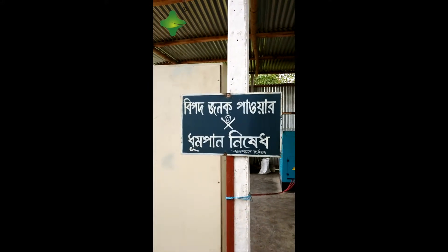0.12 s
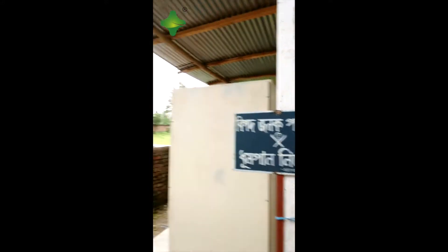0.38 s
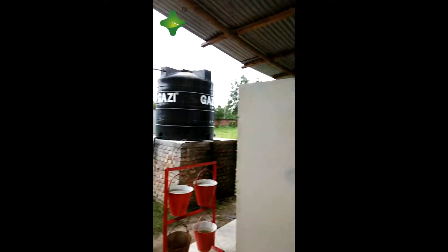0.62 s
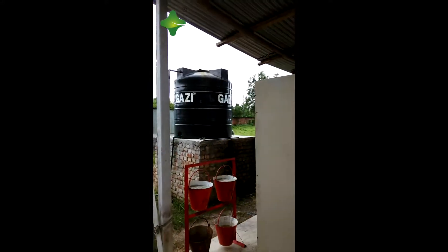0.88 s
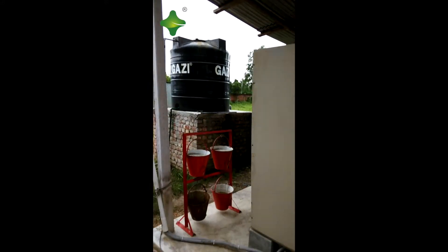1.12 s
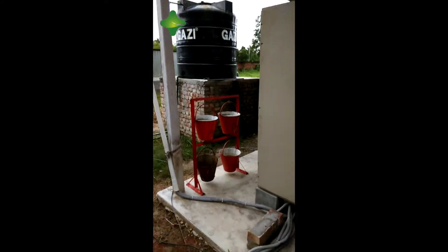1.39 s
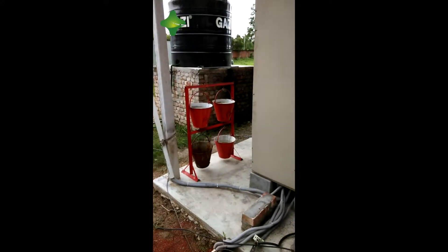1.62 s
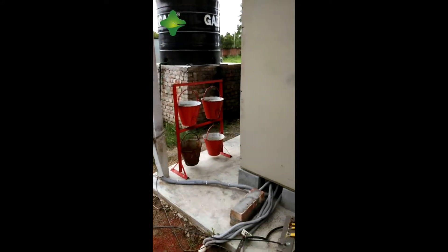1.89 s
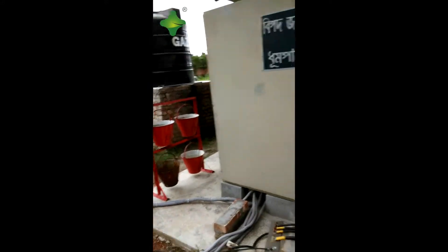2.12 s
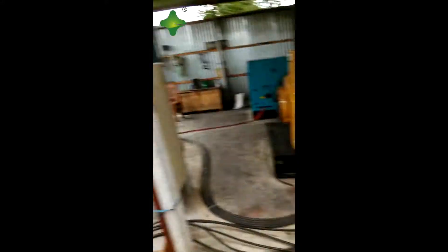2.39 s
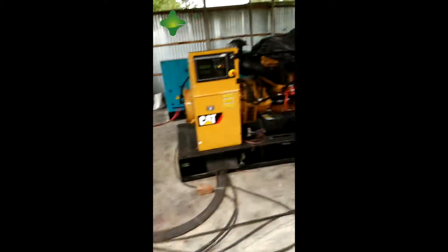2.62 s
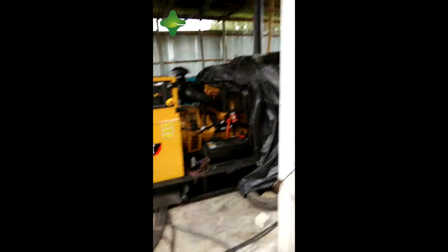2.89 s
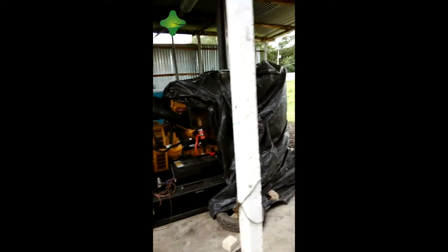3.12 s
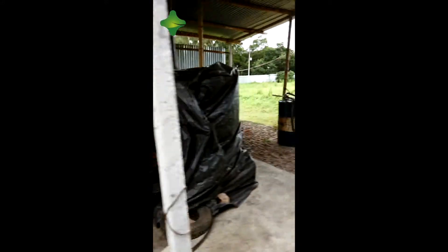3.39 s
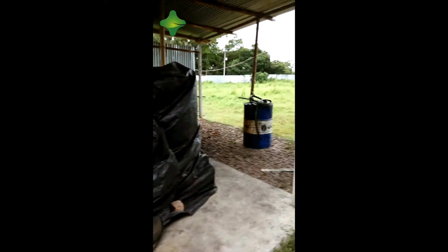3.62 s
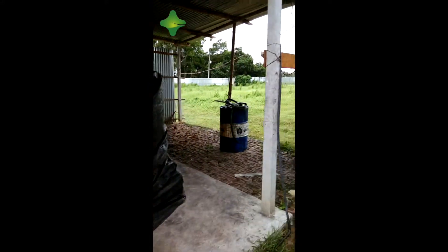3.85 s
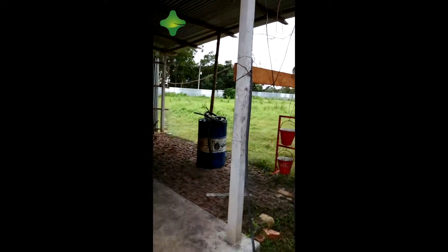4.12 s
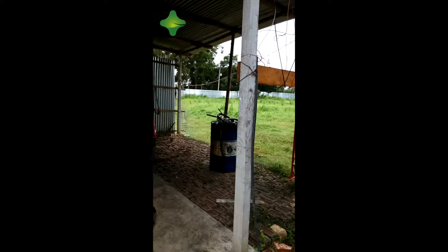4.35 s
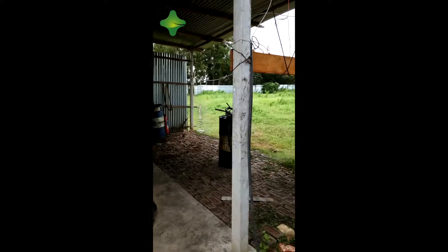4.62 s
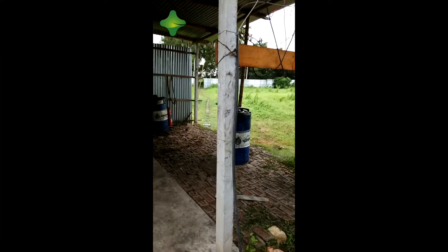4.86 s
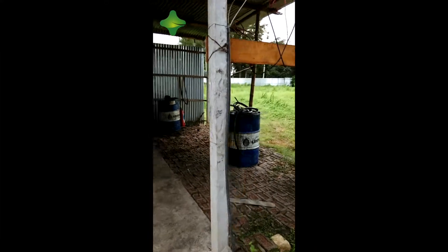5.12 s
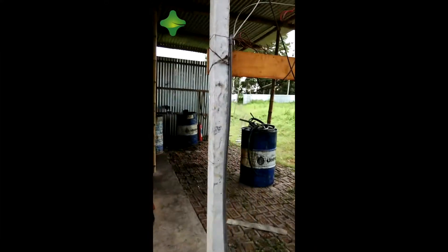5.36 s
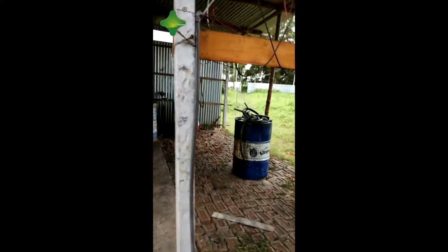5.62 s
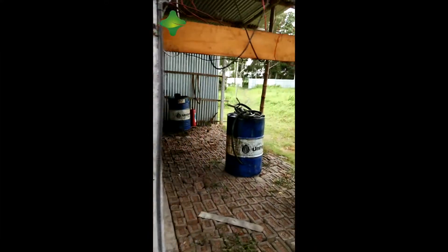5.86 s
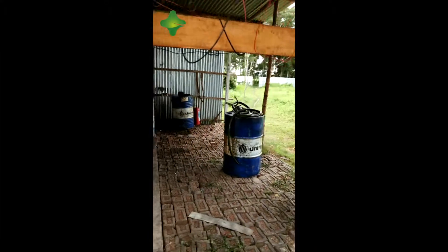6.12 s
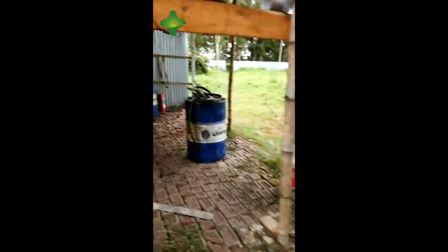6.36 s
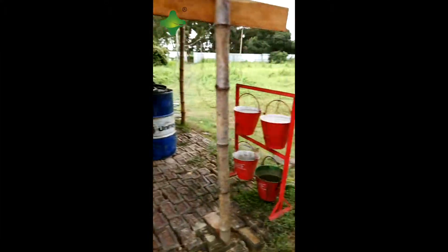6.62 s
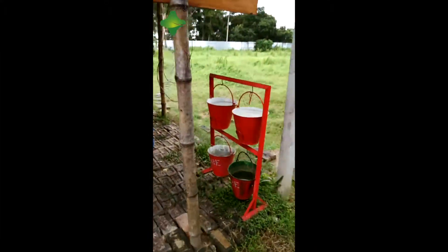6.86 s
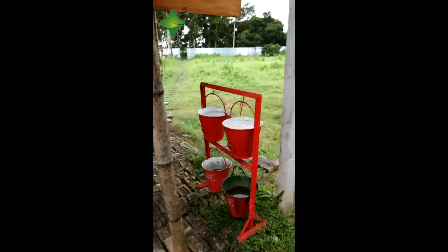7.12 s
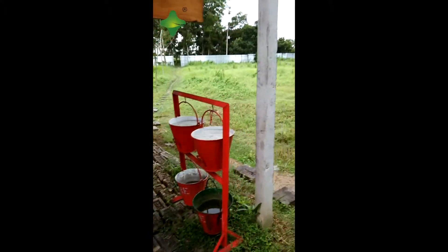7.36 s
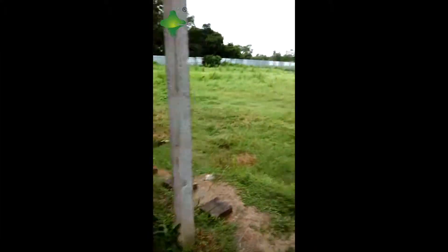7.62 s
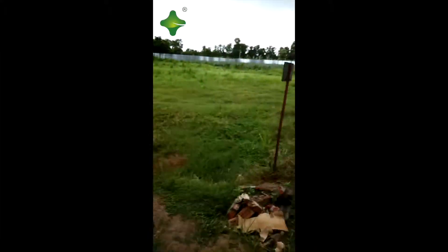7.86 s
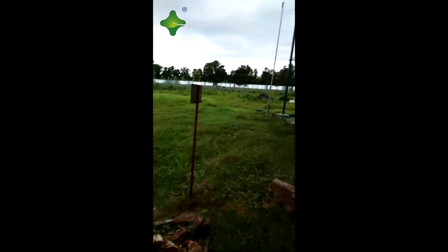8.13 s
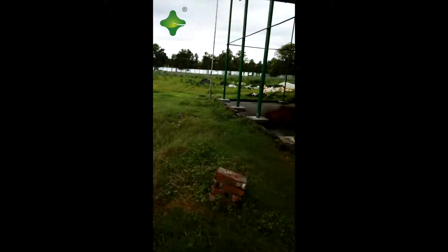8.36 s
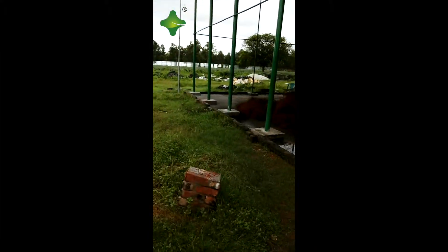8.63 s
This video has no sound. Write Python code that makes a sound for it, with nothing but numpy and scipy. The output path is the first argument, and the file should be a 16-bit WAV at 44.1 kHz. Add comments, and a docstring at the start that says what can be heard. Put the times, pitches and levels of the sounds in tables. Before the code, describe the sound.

Strong wind gusts thump the microphone, then uneven footsteps crunch over gritty paving and grass with small snaps, while faint birds chirp behind.

```python
"""In a quiet open field, someone walks over grass and gritty paving.
Gusts buffet the microphone with low thumps: shaped noise plus single pulses.
Soles swish and crunch (grains and noise through a hollow ring), and twigs and pebbles snap (short ringing tones).
Small birds chirp in falling sweeps with echoes; a whistle, hoots and a drone are narrow bands of noise.
Thin insect whirs and a soft hush of filtered noise lie behind."""
import sys
import numpy as np
from scipy import signal
from scipy.fft import next_fast_len
from scipy.io import wavfile
from scipy.ndimage import uniform_filter1d

SR = 44100
rng = np.random.default_rng(int(sys.argv[2]) if len(sys.argv) > 2 else 0)


def log_audio(samples):
    """Write samples as a 16-bit WAV file to the path given in sys.argv[1]."""
    # one column per channel
    frames = np.atleast_2d(samples).T
    # limit to full scale, then quantise
    limited = np.clip(frames, -1, 1)
    pcm = np.round(limited * 32767).astype(np.int16)
    wavfile.write(sys.argv[1], SR, pcm)


def boost_factor(decibels):
    """Convert a level in decibels to a linear amplitude factor."""
    exponent = np.asarray(decibels, float) / 20
    return 10 ** exponent


N = 385434
TIME = np.arange(N) / SR  # seconds

# Tone colour of the field's hush. Each row: frequency in Hz, relative strength in dB per Hz.
HUSH_COLOUR = [(20, -28.5), (50, -4), (130, 1), (400, 3), (1000, -3.5), (2000, -4.5), (3200, -6),
               (4000, -8), (6300, -13.5), (10000, -26), (13000, -14)]
# The hush slowly rises and falls in level. Each row: time in seconds, change in dB.
HUSH_LEVEL_CHANGE = [(0, 2), (2, 0), (5.3, 1.5), (6.3, 0.5), (6.75, -3), (7.5, -4.5), (8.05, -4),
                     (8.74, -1)]
# Thin insect whirs. Each row: start in seconds, end in seconds, pitch in Hz, width of each of two
# resonances in Hz, middle level in dB.
INSECT_WHIRS = [(.55, 1.6, 8300, 400, -91), (2.95, 3.4, 8200, 300, -91), (3.9, 4.3, 8200, 300, -92),
                (.2, 3.3, 10400, 700, -94), (4.3, 7.3, 10200, 700, -94)]
# A soft low drone that swells and fades. Each row: time in seconds, pitch in Hz, level in dB.
LOW_DRONE = [(5.3, 340, -88), (5.43, 338, -69), (5.6, 361, -69), (5.95, 360, -67), (6.2, 350, -71),
             (6.55, 319, -71), (6.7, 320, -88)]
# Soft low hoots in the distance. Each row: start in seconds, length in seconds, first pitch in Hz,
# last pitch in Hz, level in dB between the fades.
SOFT_HOOTS = [(.68, 0.198, 895.5, 914.6, -76), (3.378, .14, 350.1, 329.7, -68.5),
              (4.155, .26, 726.7, 702, -72.5), (4.421, 0.2397, 686.7, 664, -67),
              (5.083, 0.514, 724.3, 668, -79.5), (5.396, 0.375, 344.4, 408, -70.5),
              (6.101, 0.252, 724.6, 670.7, -78), (7.167, 0.116, 340, 342.3, -74),
              (7.382, 0.104, 352.6, 349.3, -73.5)]
# A blurred rising whistle far off. Each row: time in seconds, pitch in Hz, level in dB.
FAR_WHISTLE = [(5.19, 4500, -71.5), (5.23, 4250, -69.5), (5.29, 4370, -66.5), (5.34, 4350, -67),
               (5.37, 4770, -66), (5.42, 4900, -75.5)]
# Falling bird chirps. Each row: start in seconds, direct level in dB, echo level in dB before a 2.5 dB lift.
FALLING_CHIRPS = [(.56, -100.5, -75), (0.744, -75, -68.5), (.785, -88, -70), (.975, -77, -67.5),
                  (1.012, -83.5, -70.5), (1.2, -72.5, -67), (1.24, -83, -74.5), (3.92, -81, -74),
                  (4.12, -91.5, -75), (5.169, -80.5, -67), (5.212, -70, -80), (5.405, -67, -65),
                  (5.44, -60.5, -72.5), (5.595, -76.5, -82.5), (5.632, -61.5, -66.5), (5.669, -59.5, -69)]
# Twigs and pebbles that snap. Each row: start in seconds, peak level in dB before a 1.8 dB cut, pitch in Hz,
# upper tone in dB relative to the lower before a 3 dB lift, seconds for the lower tone to fade by 60 dB.
TWIG_SNAPS = [(1.222, -44, 874.8, -10.5, 0.0267), (1.698, -51.5, 856.7, 7, 0.0076),
              (1.719, -45, 927, -1.5, 0.0082), (1.824, -51, 2290, -14.5, 0.0092),
              (2.247, -45, 1137, -22.5, 0.0128), (2.811, -47, 1260, -16.5, 0.0077),
              (2.856, -49.5, 1544, -12, 0.012), (2.986, -41.5, 1679, -8.5, 0.0114),
              (3.158, -41, 1150, -5, 0.0099), (3.526, -39.5, 1126, -28.5, 0.0093),
              (3.585, -43.5, 1350, -22, 0.0123), (3.615, -35, 1410, -34.5, 0.0083),
              (3.698, -51.5, 816, -16.5, 0.00677), (3.733, -38, 909.5, -27.5, 0.0144),
              (3.78, -40.5, 1420, -19, 0.013), (4.125, -44, 2455, -20, 0.00595),
              (4.302, -46.5, 1326, -2.5, 0.0078), (4.314, -51, 1300, -14, 0.00919),
              (4.335, -38.5, 713, -1, 0.0115), (4.374, -36.5, 1012, 13.5, 0.0079),
              (4.731, -45, 1304, -0.5, 0.0081), (4.798, -44, 1050, 0.5, 0.00593),
              (4.83, -45, 997, -11.5, 0.0164), (4.883, -60.5, 1030, -10.5, 0.009),
              (4.935, -43.5, 1100, 1, 0.0088), (5.011, -54.5, 937, -14, 0.0089),
              (5.032, -37.5, 915, 3.5, 0.0079), (5.058, -39.5, 1068, -4.5, 0.0143),
              (5.611, -45, 1480, 4, 0.0058), (5.642, -54, 1270, -3.5, 0.0057),
              (5.674, -40, 1053, 2.5, 0.0108), (5.701, -41.5, 2240, -11, 0.0079),
              (6.051, -46.5, 564, -22, 0.015), (6.237, -42.5, 1367, 0.5, 0.0164),
              (6.273, -45.5, 1140, 2.5, 0.0067), (6.333, -46, 960, -0.5, 0.0068),
              (6.359, -42, 920, -9, 0.00603), (6.638, -56.5, 1160, -7, 0.00876),
              (6.795, -55, 1270, -8, 0.0138), (6.814, -39, 1150, -1, 0.0139),
              (6.858, -44, 1086, 4.5, 0.0123), (6.93, -42, 1130, -18.5, 0.0165),
              (6.954, -41.5, 1296, -1.5, 0.0065), (7.005, -43.5, 1900, -4.5, 0.0048),
              (7.06, -45.5, 1200, -4, 0.005), (7.108, -49.5, 1200, -4, 0.0052),
              (7.126, -40.5, 1200, -1.5, 0.005), (7.263, -40.5, 1220, -1, 0.0081),
              (7.704, -43, 982, -26, 0.0105), (7.753, -43.5, 1091, -17.5, 0.016),
              (7.78, -40.5, 974, -21, 0.032), (7.841, -36, 857, -24.5, 0.0093),
              (8.187, -52, 824, -25.5, 0.0082), (8.341, -48.5, 1240, -22.5, 0.0125),
              (8.534, -43.5, 1130, -26, 0.012)]
# Tone colour of the crunching ground. Each row: frequency in Hz, relative strength in dB per Hz.
GROUND_COLOUR = [(120, -39.5), (200, -20), (330, -6.5), (540, -4), (960, -5.5), (1460, -7.5), (2020, -4),
                 (3200, -10.5), (4200, -21.5), (6000, -28.5), (13000, -55.5)]
# Soles that press and drag. Each row: peak time in seconds, peak level in dB, seconds to rise 20 dB,
# seconds to fall 20 dB (signs ignored), middle pitch in Hz of the hollow under the sole.
SOLE_SCUFFS = [(.04, -68, .5, .3, 1950), (.17, -70, 0.03, .15, 1850), (.6, -70.5, 0.34, 0.38, 705.6),
               (.85, -74, 0.21, .3, 1500), (.98, -71, 0.2218, 0.17, 1196), (1.3, -73, -0.97, 0.64, 845),
               (1.6, -71, 0.24, .2, 1900), (1.719, -64, -0.0425, 0.1254, 1290),
               (1.83, -77, 0.1194, 0.02, 1710), (2.26, -64, 0.373, 0.64, 1018),
               (2.4, -53, 0.18, 0.22, 1023), (2.54, -57, 0.1344, 0.12, 1254),
               (2.95, -57.5, 0.3033, 0.4, 1340), (3.1, -50, 0.137, 0.117, 972),
               (3.159, -50, -0.0046, 0.076, 1220), (3.3, -70, 0.31, 0.13, 1000),
               (3.6, -60.5, 0.38, 0.2948, 1157), (3.741, -50.5, 0.1467, 0.1978, 878),
               (4.055, -59.5, 0.0662, -0.05, 478.4), (4.15, -67, 0.35, 0.94, 1520),
               (4.31, -54.5, 0.014, 0.0849, 1090), (4.385, -49.5, 0.091, 0.2765, 1275),
               (4.8, -63.5, 0.28, 0.75, 1210), (5.06, -50.5, 0.0646, 0.1922, 1036),
               (5.3, -77, -0.4, 0.95, 950), (5.5, -72, -0.69, -0.27, 800),
               (5.701, -55.5, 0.0967, 0.16, 1096), (5.8, -54, 0.1614, 0.1246, 1112),
               (5.89, -60.5, 0.14, 0.06, 1210), (5.93, -66.5, 0.29, 0.0951, 420),
               (6.07, -63.5, 0.16, 0.06, 500), (6.16, -71, -0.1, -0.12, 420),
               (6.27, -65.5, -0.24, 0.16, 1107), (6.36, -56, 0.0835, 0.0632, 1014),
               (6.409, -47.5, 0.02, 0.09, 1068), (6.47, -62.5, 0.2243, 0.0974, 450),
               (6.55, -60, 0.29, .16, 1300), (6.85, -65, 0.1655, 0.36, 1268),
               (6.936, -51, 0.0053, .04, 910), (7.05, -55, 0.2176, 0.2379, 1106),
               (7.15, -55.5, 0.2156, 0.0553, 1587), (7.22, -62, 0.4435, 0.1352, 1534),
               (7.36, -72.5, 1.42, 0.13, 1200), (7.6, -69, .15, 0.03, 1300),
               (7.71, -61.5, 0.0338, 0.14, 1000), (7.78, -54.5, 0.09, 0.09, 970),
               (7.84, -57.5, 0.074, 0.0729, 1024), (8.19, -70, 0.24, 1.43, 1102),
               (8.35, -67, 0.1274, 0.15, 1090), (8.46, -59.5, 0.07, 0.2, 1093),
               (8.545, -55, 0.0453, 0.0448, 1150), (8.66, -62.5, 0.2436, 0.09, 1254)]
# Bursts of fine sand and grass hiss. Each row: peak time in seconds, peak level in dB,
# seconds to rise 20 dB, seconds to fall 20 dB (signs ignored).
SAND_SPRAYS = [(3.11, -88.5, 0.34, -0.49), (4.31, -80, -0.03, -0.05), (4.38, -86, -0.01, 0.02),
               (4.53, -86, 0.02, 0.06), (6.412, -77, -0.0448, -0.4948), (7.03, -86, -0.47, 0.06)]
# Gusts on the microphone. Each row: peak time in seconds, peak level in dB before a 1 dB cut, seconds to
# rise 20 dB, seconds to fall 20 dB (signs ignored), eddy pitch in Hz before the gust's strength shifts it.
WIND_GUSTS = [(.025, -32, .08, .03, 140), (.12, -32, .045, 0.061, 126.9), (.165, -42, -0.29, .06, 125.1),
              (.24, -55, 0.38, 0.2, 110.1), (.338, -21, 0.0279, 0.0169, 156), (.4, -36, 0.08, 0.02, 120.2),
              (.47, -32, 0.0119, 0.0165, 155), (.542, -23, 0.0862, 0.0578, 167.7),
              (.59, -25, 0.0512, -0.0035, 172), (.65, -34, 0.1, 0.07, 125),
              (.765, -32, 0.1272, 0.0911, 141.5), (.904, -34, 0.1158, 0.0364, 156.2),
              (1.082, -36.5, 0.16, 0.0948, 123), (1.212, -38, 0.1435, 0.097, 139.4),
              (1.368, -44.5, 0.1365, 0.31, 121.9), (1.524, -51.5, 0.05, 0.16, 132),
              (1.768, -50.5, 0.02, 0.11, 96), (2.005, -39, 0.03, 0.0743, 101.9),
              (2.12, -47.5, 0.0272, 0.0323, 140.3), (2.17, -35, 0.0139, 0.0582, 164),
              (2.204, -31.5, 0.0465, 0.0585, 133.4), (2.265, -36.5, 0.03, 0.03, 155.3),
              (2.316, -32, 0.0452, 0.0842, 163.7), (2.372, -35, 0.1058, 0.0736, 128.1),
              (2.42, -37.5, 0.06, 0.0246, 139.5), (2.506, -41, 0.1118, 0.04, 136),
              (2.63, -40.5, 0.1078, 0.0813, 139.8), (2.72, -47.5, 0.22, 0.0586, 120.1),
              (2.83, -62.5, 0.43, -0.17, 105), (2.964, -56, 0.11, 0.08, 106),
              (3.07, -54.5, 0.22, -0.0252, 105), (3.25, -73.5, -3.33, -0.84, 87.1),
              (3.48, -73.5, -0.26, 0.1, 120.1), (3.64, -60, 0.03, 0.06, 115),
              (3.68, -45.5, 0.0444, 0.0314, 115), (3.8, -56.5, 0.1257, .08, 119),
              (4.02, -56.5, 0.0648, 0.2358, 98.8), (4.13, -50.5, -0.0168, 0.1624, 105.9),
              (4.26, -48, 0.0945, 0.0518, 118), (4.5, -61, 0.16, 0.06, 86.13),
              (4.64, -63, 0.1253, .1, 95.1), (4.79, -68, 0.077, -0.29, 160), (5.065, -55, .02, .03, 106),
              (5.12, -57, 0.02, 0.1043, 100.9), (5.185, -50, .02, .03, 108),
              (5.23, -54.5, 0.0452, 0.06, 104.9), (5.34, -55, 0.0634, 0.08, 114),
              (5.49, -48.5, 0.06, 0.04, 106.2), (5.545, -45.5, -0.0183, 0.035, 130.2),
              (5.72, -61.5, .15, 0.1349, 110.6), (5.86, -63.5, 0.42, 0.09, 89.4),
              (6.05, -67.5, 0.12, 0.1447, 215.5), (6.24, -72, -0.3, 0.17, 159.8),
              (6.38, -63, 0.14, 0.1277, 150), (6.5, -70.5, 0.32, 0.11, 199.7), (6.88, -80, 0.44, 0.6, 82),
              (7.04, -74, 0.24, 0.24, 109.9), (7.2, -78.5, 0.28, 0.57, 109.8),
              (7.59, -69, 0.2, 0.11, 154.2), (7.8, -78, 0.47, 0.11, 200.3), (8.45, -71.5, 0.19, 0.1, 147.6),
              (8.545, -49, 0.026, -0.45, 95), (8.61, -44, 0.0637, 0.09, 131),
              (8.64, -57.5, 0.05, -0.35, 90.1), (8.69, -57.5, 0.0724, 0.45, 89.9)]
# Single strong eddies. Each row: peak time in seconds, level in dB before a 2 dB lift, pitch in Hz,
# sharp edge in dB relative to the push.
SINGLE_EDDIES = [(0.03, -24, 148, -24), (0.126, -26.5, 146.3, -28), (0.24, -45.5, 118.3, -21),
                 (0.325, -28.5, 150, -28.5), (0.337, -23, 174, -8.5), (0.353, -20.5, 151.5, -3),
                 (0.399, -22.5, 130, -17.5), (0.469, -22.5, 191.5, -31), (0.533, -17, 203, -17.5),
                 (0.558, -20, 190.8, -13), (0.579, -20.5, 211.3, -14), (0.594, -21.5, 219.4, -13.5),
                 (0.636, -27.5, 139.6, -32.5), (0.667, -28, 169.5, -25), (0.744, -29, 164, -39.5),
                 (0.773, -27.5, 237, -41), (0.805, -29, 131.7, -34), (0.898, -23.5, 159, -37.5),
                 (0.918, -28, 186, -45), (1.085, -29.5, 140.2, -28.5), (1.213, -29, 156.2, -37.5),
                 (1.37, -36.5, 134.2, -41.5), (1.439, -40.5, 156.6, -47), (1.463, -40, 135, -36.5),
                 (2.008, -39, 108, -28.5), (2.208, -19, 148.6, -20.5), (2.265, -28.5, 189.6, -24.5),
                 (2.32, -25, 191.6, -20.5), (2.361, -26, 150, -18), (2.377, -22, 162, -24.5),
                 (2.422, -32, 187.4, -29), (2.478, -37.5, 111.6, -15), (2.503, -31, 161.4, -16.5),
                 (2.619, -30, 225, -43), (2.644, -35, 119.9, -33), (2.715, -38, 139.5, -24.5),
                 (2.965, -40, 105.7, -30), (3.007, -43, 128.5, -22.5), (3.055, -47.5, 119, -13.5),
                 (3.682, -36.5, 131, -16.5), (4.129, -45.5, 113, -32.5), (4.242, -37, 144.5, -35),
                 (4.279, -38, 111.6, -33.5), (5.186, -32, 113.8, -26), (5.5, -39.5, 109, -26.5),
                 (5.541, -35, 110, -29.5), (5.563, -23.5, 164.2, -15.5), (8.557, -39, 101.6, -25.5),
                 (8.596, -39.5, 119, -26.5), (8.608, -33.5, 150, -20.5)]


def read(points, hz):
    """Looks up a tone colour table at the frequencies hz."""
    f, value = np.transpose(points)
    return np.interp(np.log(hz + 1), np.log(f + 1), value)


def curve(rows):
    """Draws straight lines between table rows, giving each column at every sample."""
    s, *columns = np.transpose(rows)
    return [np.interp(TIME, s, column) for column in columns]


def evened(x):
    """Scales a sound to an average strength (rms) of 1."""
    return x / np.sqrt(np.mean(x ** 2) + 1e-20)


def add(mix, s, sound):
    """Mixes a sound in at time s."""
    part = mix[round(s * SR):][:len(sound)]
    part += sound[:len(part)]


def resonate(x, hz, width_hz):
    """Rings at the moving pitch hz, leaving that pitch at its own strength."""
    turn = np.exp(2j * np.pi * np.cumsum(hz * np.ones(len(x))) / SR)
    r = np.exp(-np.pi * width_hz / SR)
    return 2 * (turn * signal.lfilter([1 - r], [1, -r], x / turn)).real


def colour(x, points):
    """Gives a sound the tone colour of a table, with a filter that never acts ahead of time."""
    gain_db = read(points, abs(np.fft.fftfreq(4096, 1 / SR)))
    log_gain = np.log(boost_factor(np.maximum(gain_db, -100)))
    taps = np.fft.ifft(np.exp(np.conj(signal.hilbert(log_gain)))).real[:2048]
    return signal.oaconvolve(x, taps)[:len(x)]


def lumps(per_s):
    """Slow random wandering of rms 1; a higher per_s wanders faster."""
    size = round(SR / per_s)
    return evened(uniform_filter1d(uniform_filter1d(rng.standard_normal(N), size), size))


def swells(rows, floor_db):
    """Adds the power of overlapping swells; gives times, level in dB and each swell's share of their power."""
    roundness = 1.172  # 1 = pointed swells, 2 = domed
    t = np.arange(0, N / SR + .002, .002)
    s, db, rise_s, fall_s = np.transpose(rows)[:4, :, None]
    distance = np.where(t < s, (s - t) / abs(rise_s), (t - s) / abs(fall_s))
    power = boost_factor(db - 20 * distance ** roundness) ** 2
    total = power.sum(0) + boost_factor(floor_db) ** 2
    return t, 10 * np.log10(total), power / power.sum(0)


def fuzzy_tone(rows, width_hz):
    """A distant tone blurred by the air: noise through two equal narrow moving resonances."""
    hz, db = curve(rows)
    tone = resonate(resonate(rng.standard_normal(N), hz, width_hz), hz, width_hz)
    return evened(tone) * boost_factor(db) * (TIME > rows[0][0]) * (TIME < rows[-1][0])


def field_hush():
    """Steady noise with the field's tone colour, whose level wanders and follows the level table."""
    hush = evened(colour(rng.standard_normal(N), HUSH_COLOUR))
    change_db = curve(HUSH_LEVEL_CHANGE)[0]
    return boost_factor(-74.5) * hush * boost_factor(0.53 * lumps(per_s=2.1) + change_db)


def insects():
    """High whirs: noise through two narrow resonances, wavering in level and faded at the ends."""
    out = np.zeros(N)
    for start, end, hz, width_hz, db in INSECT_WHIRS:
        count = round((end - start) * SR)
        whir = evened(resonate(resonate(rng.standard_normal(count), hz, width_hz), hz, width_hz))
        level = boost_factor(db + 3.5 * lumps(per_s=4)[:count])
        add(out, start, level * whir * signal.windows.tukey(count, .3))
    return out


def drone():
    """A soft low drone: noise in a fairly narrow band that swells and fades."""
    return fuzzy_tone(LOW_DRONE, width_hz=231)


def hoot(start, length, first_hz, last_hz, db):
    """One soft gliding hoot: a narrow band of noise that fades in and out."""
    along = np.array([0, .2, .8, 1])  # share of the length
    hz = first_hz + along * (last_hz - first_hz)
    level_db = db - 12 * np.array([1, 0, 0, 1])  # softer at the very ends
    return fuzzy_tone(np.transpose([start + along * length, hz, level_db]), width_hz=15.0)


def whistle():
    """A far whistle: a blurred band of noise whose pitch mostly climbs."""
    return fuzzy_tone(FAR_WHISTLE, width_hz=730)


def chirps():
    """Near-pure falling sweeps; trees and walls smear each into a long echo."""
    length_s, top_hz, bottom_hz = .026, 5650, 4350
    t = np.arange(0, length_s, 1 / SR)
    hz = np.interp(t, [0, length_s], [top_hz, bottom_hz])
    sweep = np.sin(2 * np.pi * np.cumsum(hz) / SR) * np.sin(np.pi * t / length_s) * 2 ** .5
    out = np.zeros(N)
    echo_t = np.arange(SR) / SR
    # the echo builds up over 0.029 s and fades by 60 dB in 0.74 s
    echo_shape = boost_factor(-60 * echo_t / 0.74) * np.minimum(echo_t / 0.029, 1)
    for s, direct_db, echo_db in FALLING_CHIRPS:
        echo = rng.standard_normal(SR) * echo_shape
        add(out, s, boost_factor(direct_db) * sweep)
        add(out, s, boost_factor(echo_db + 2.5) * signal.oaconvolve(sweep, echo / np.linalg.norm(echo)))
    return out


def snaps():
    """Each snap sets off two short ringing tones, with a small scatter from the ground."""
    out = np.zeros(N)
    t = np.arange(1500) / SR
    ratios = rng.uniform(1.83, 2.66, len(TWIG_SNAPS))  # upper pitch over lower pitch
    for (s, db, hz, upper_db, fade_s), ratio in zip(TWIG_SNAPS, ratios):
        low = boost_factor(-60 * t / max(fade_s, .002)) * np.sin(2 * np.pi * hz * t)
        high = boost_factor(upper_db + 3.0 - 60 * t / 0.00258) * np.sin(2 * np.pi * hz * ratio * t)
        onset = np.minimum(t / 0.00038, 1)
        add(out, s, -boost_factor(db - 1.8) * (low + high) * onset)
    # small things radiate no bass
    out = signal.sosfilt(signal.butter(2, 600, "highpass", fs=SR, output="sos"), out)
    tail = rng.standard_normal(2000) * boost_factor(-60 * np.arange(2000) / SR / 0.045)
    scatter = signal.oaconvolve(out, tail / np.linalg.norm(tail))[:N]
    return out + boost_factor(-10.5) * scatter


def feet():
    """Grit grains and a soft swish under each sole, through the ground's colour and a moving hollow."""
    at, level_db, share = swells(SOLE_SCUFFS, floor_db=-92.5)  # the floor is the feet at rest
    tread_db = np.interp(TIME, at, level_db)
    hollow_hz = np.interp(TIME, at, np.array(SOLE_SCUFFS)[:, 4] @ share)
    # about 900 grains a second, of random size
    grains = boost_factor(5.0 * np.minimum(rng.exponential(1, N), 3.5)) * (rng.random(N) < 900 / SR)
    swish = rng.standard_normal(N)
    rub = (-.7 * evened(grains) + .7 * swish) * boost_factor(1.5 * lumps(per_s=150))
    hollow = resonate(rub, hollow_hz * boost_factor(1.227 * lumps(per_s=14)), 400)
    # a light touch excites mostly the hollow, a firm tread all the grit
    firm = np.clip((tread_db + 88.5) / 25, .2, 1)
    body = colour(firm * rub + 2.48 * hollow, GROUND_COLOUR)
    body /= np.sqrt(uniform_filter1d(body ** 2, size=2500))  # the tread, not chance, sets the slow level
    treble_band = signal.butter(2, (3800, 11500), "bandpass", fs=SR, output="sos")
    fine = evened(signal.sosfilt(treble_band, rub + 2.6 * rng.standard_normal(N)))
    # hiss of grass blades and sand: -84 dB at a middling tread, growing with the tread
    hiss_db = -84 + 0.2568 * (tread_db + 63.5)
    spray_db = np.interp(TIME, *swells(SAND_SPRAYS, floor_db=-110)[:2])
    return boost_factor(tread_db) * body + (boost_factor(hiss_db) + boost_factor(spray_db)) * fine


def gust_rumble():
    """Lumpy low turbulence whose pitch and reach into the treble rise with the gust."""
    at, level_db, share = swells(WIND_GUSTS, floor_db=-92)  # the floor is the calm
    hz, t, z = signal.stft(rng.standard_normal(N), SR, nperseg=1024, noverlap=768)
    strength = np.interp(t, at, level_db) + 38.5
    pitch_hz = np.interp(t, at, np.array(WIND_GUSTS)[:, 4] @ share)
    # an eddy flutters 1 Hz faster for each dB of gust
    centre_hz = np.clip(pitch_hz + 1.0 * strength, 40, 400)
    octaves = np.log2((hz[:, None] + 1) / centre_hz)
    curl = np.clip(7.5 - 0.088 * strength, 3, 15)  # strong gusts reach higher
    shape = boost_factor(np.where(octaves > 0, -3.0 * octaves - curl * octaves ** 2, 4.7 * octaves))
    shape = shape / np.linalg.norm(shape, axis=0)
    rumble = signal.istft(z * shape, SR, nperseg=1024, noverlap=768)[1][:N]
    gust_db = np.interp(TIME, at, level_db)
    return evened(rumble * boost_factor(2.09 * lumps(per_s=120))) * boost_factor(gust_db - 1.0)


def wind():
    """The gusts' rumble, with single strong eddies as short low pulses with a steep front on top."""
    out = gust_rumble()
    for s, db, pitch_hz, edge_db in SINGLE_EDDIES:
        turns = np.arange(-2, 3, pitch_hz / SR)  # cycles of the eddy around its peak
        first_s = s + turns[0] / pitch_hz
        bump = np.exp(-(turns / np.where(turns < 0, .5, .75)) ** 2)
        slowed = turns - 0.156 * turns * abs(turns + .5)  # it slows as it passes
        push = -bump * np.cos(2 * np.pi * slowed)
        start = round(first_s * SR)
        out[start:start + len(turns)] *= 1 - 0.578 * np.hanning(len(turns))  # sweeps the small eddies aside
        edge = np.exp(-((turns + .25) / 0.24) ** 2) * np.sin(2 * np.pi * 2.342 * turns)  # the steep front
        add(out, first_s, boost_factor(db + 2.0) * (push + boost_factor(edge_db) * edge))
    return out


def scene():
    """The hush of the field, insects, distant calls, snaps, feet and wind in one channel."""
    background = field_hush() + insects() + drone()
    calls = sum(hoot(*row) for row in SOFT_HOOTS) + whistle() + chirps()
    return (background + calls + snaps() + feet() + wind())[None]


def band_limit(x):
    """A steep low-pass at the top of the band."""
    return signal.sosfilt(signal.butter(12, 12800, fs=SR, output="sos"), x)


def record(dry):
    """The microphone drops the deepest bass; rate conversion leaves a faint mirror of the bass high up."""
    miked = signal.sosfilt(signal.butter(2, 45, "highpass", fs=SR, output="sos"), dry)
    turn = np.exp(2j * np.pi * 8000 * TIME)
    one_sided = signal.hilbert(miked, next_fast_len(N))[:, :N]
    mirror = boost_factor(-54.0) * (np.conj(one_sided) * turn).real  # the bass lands just under 8000 Hz
    return band_limit(miked + mirror)


dry = scene()
out = record(dry)
log_audio(out)
```